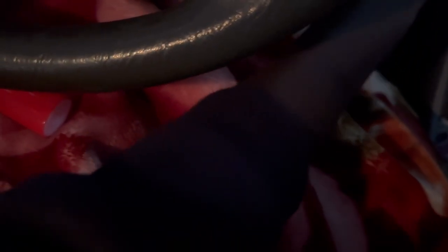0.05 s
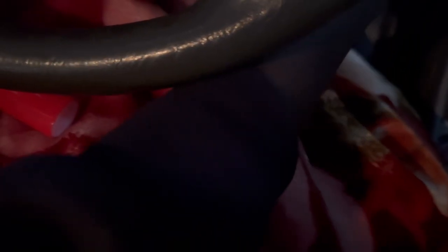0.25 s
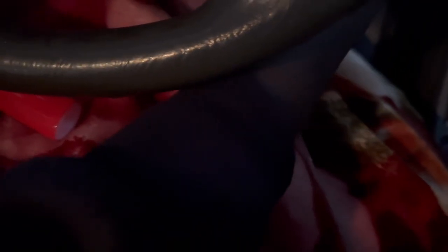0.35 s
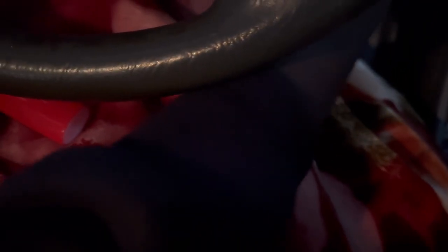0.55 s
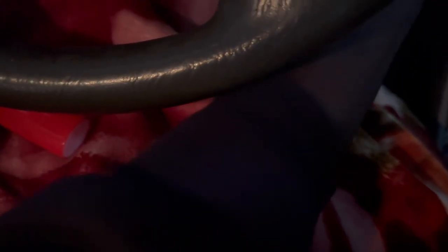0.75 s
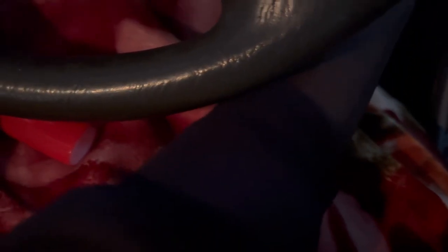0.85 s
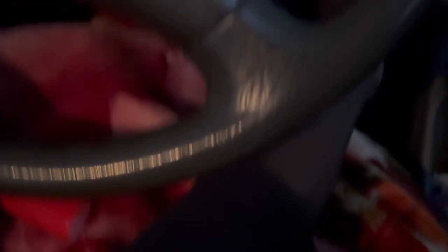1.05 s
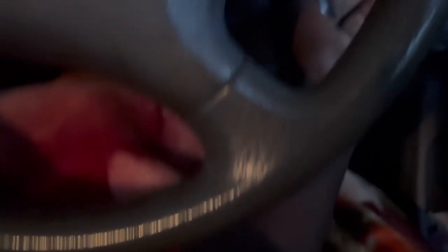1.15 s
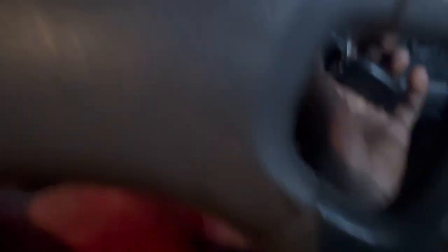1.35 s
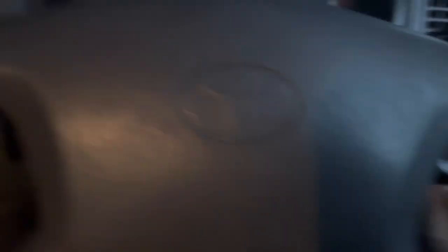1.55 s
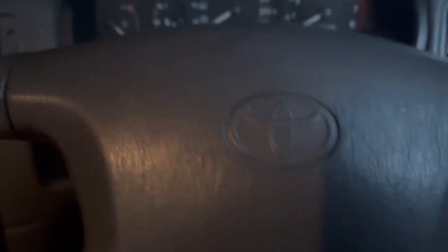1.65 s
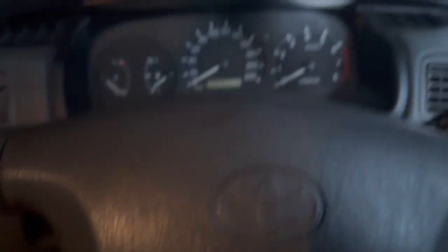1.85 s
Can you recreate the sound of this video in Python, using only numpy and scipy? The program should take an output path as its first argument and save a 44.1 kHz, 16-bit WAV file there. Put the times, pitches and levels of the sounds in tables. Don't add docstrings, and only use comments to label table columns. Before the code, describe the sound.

Key turning in a car ignition with sharp metallic clicks and dull thuds, followed by brief key jingle

```python
import sys
import numpy as np
from scipy import signal
from scipy.fft import rfft, irfft, next_fast_len
from scipy.io import wavfile
from scipy.ndimage import uniform_filter1d, map_coordinates

SR = 44100
rng = np.random.default_rng(int(sys.argv[2]) if len(sys.argv) > 2 else 0)


def field_ratio(decibels):
    return 10 ** (np.asarray(decibels, dtype=float) / 20)


def wrap_up_sound(samples):
    columns = np.atleast_2d(samples).T
    tamed = np.clip(columns, -1, 1)
    steps = np.round(tamed * 32767).astype(np.int16)
    wavfile.write(sys.argv[1], SR, steps)


N = 83790

# (frequency [Hz], level [dB])
RUMBLE_COLOUR = [(12, -51), (20, -21), (43, -3), (97, -3.5), (108, -12), (182, -11), (300, -39.5),
                 (390, -81), (660, -120)]
# (frequency [Hz], level [dB])
HISS_COLOUR = [(180, -53.5), (300, -3.5), (825, -14.5), (4710, -21.5), (6560, -24), (15800, -32.5)]
# (frequency [Hz], likeness [0-1])
HISS_LIKENESS = [(300, 0.089), (9500, 0.09), (10500, 0.31)]
# (frequency [Hz], likeness [0-1])
PORT_LIKENESS = [(200, 0.99), (350, 0.25), (1500, 0.23), (5000, 0.19), (9500, 0.13), (10500, 0.88)]
# (frequency [Hz], difference [dB])
LEFT_LEAN = [(60, 2.5), (130, -5.5), (290, 9.5), (640, 1.5), (1410, -4.5), (3100, -3.5), (6820, 3),
             (15000, -2)]
# (frequency [Hz], width [Hz], amount taken out [dB])
HOUSING_DIP = [(11300, 1400, -6.5)]
# (frequency [Hz], time [s])
CABIN_FADE = [(200, 0.52), (2000, 0.15), (10000, 0.027)]

# (start [s], length [s], level [dB])
RUB_STROKES = [(0.052, 0.1, -62), (0.204, 0.025, -55.5), (0.272, 0.047, -50), (0.352, 0.06, -52),
               (0.449, 0.028, -53.5), (0.481, 0.071, -48.5), (0.685, 0.062, -65), (0.811, 0.052, -69.5),
               (1.008, 0.11, -62.5), (1.194, 0.28, -61.5), (1.331, 0.21, -65.5), (1.618, 0.059, -83.5)]
# (frequency [Hz], level [dB])
RUB_COLOUR = [(200, 3.5), (500, 4.5), (900, -14), (2200, -8), (4300, -11), (9000, -19), (15500, -26),
              (16200, -56)]

# (time [s], peak level [dB], panel note [Hz])
COLUMN_THUDS = [(-0.004, -35, 288), (0.058, -43.5, 429), (0.15, -56.5, 258), (0.236, -28.5, 450),
                (0.309, -28.5, 443), (0.385, -23, 377), (0.415, -22, 280), (0.451, -24, 359.6),
                (0.502, -19, 353), (0.514, -38.5, 249), (0.854, -36.5, 541), (1.088, -34.5, 244),
                (1.219, -43, 330), (1.285, -37, 422), (1.47, -53, 520)]
# (frequency [Hz], width [Hz], level [dB])
COLUMN_NOTES = [(85, 30, -2), (155, 32, 4), (195, 45, -4)]

# (frequency [Hz], level [dB])
CLICK_COLOUR = [(200, 0.5), (800, -8), (1400, -3), (4000, 5), (12400, 0.5), (15600, -8.5), (16500, -35.5),
                (17200, -71.5)]
# (time [s], peak level [dB], part struck [Hz])
TRIM_KNOCKS = [(0.057, -45.5, 533), (0.418, -29, 503), (0.714, -50, 1370), (0.745, -52.5, 466),
               (0.849, -41, 640), (0.973, -53.5, 1403), (1.01, -54.5, 1520), (1.239, -53, 553),
               (1.511, -46.5, 3080), (1.635, -63.5, 900), (1.712, -73.5, 511), (1.783, -66, 1004),
               (1.822, -68, 1353)]
# (frequency [Hz], width [Hz], level over the click [dB])
TRIM_NOTES = [(620, 370, -2), (1170, 270, 6), (1800, 530, 7.5)]

# (time [s], peak level [dB], part struck [Hz])
KEY_RATTLES = [
    (1.2012, -24, 15040),
    (1.2098, -22, 14400),
    (1.217, -27.5, 9000),
    (1.2228, -25, 6100),
    (1.2638, -32, 15440),
    (1.2696, -39, 3100),
    (1.2756, -20.5, 15300),
    (1.2821, -34.5, 14130),
    (1.2855, -34, 3075),
]
# (time [s], peak level [dB], part struck [Hz])
KEY_SLIDES = [
    (1.197, -44.5, 4300),
    (1.205, -37.5, 2720),
    (1.218, -32, 9000),
    (1.235, -48.5, 14100),
    (1.265, -41, 6490),
    (1.279, -29, 6100),
]
# (time [s], peak level [dB], part struck [Hz])
PALM_TOUCHES = [
    (1.0818, -53, 1800),
    (1.0985, -52, 2580),
    (1.1405, -51.5, 6100),
    (1.3582, -34, 7900),
    (1.3843, -36.5, 3230),
    (1.3907, -39, 3400),
    (1.4469, -61, 3200),
    (1.4631, -37, 3160),
    (1.5185, -42.5, 7590),
    (1.8864, -60.5, 3360),
]
# (frequency [Hz], width [Hz], level over the click [dB])
KEY_NOTES = [(1500, 350, 4.5), (2500, 200, 7), (3130, 570, 4), (4300, 280, 6.5), (5160, 560, 4),
             (6100, 200, 12), (7800, 250, 2.5), (9000, 400, 11), (13200, 1800, 6.5), (15430, 400, 14.5)]

# (time [s], peak level [dB], part struck [Hz])
SLOT_TAPS = [(0.0588, -40, 4300), (0.0884, -48, 4300), (0.1, -53, 4200), (0.1057, -45, 4230),
             (0.1236, -45, 2150), (0.1406, -41, 2210), (0.158, -34, 6280), (0.163, -53, 6160),
             (0.6971, -49.5, 2250), (0.735, -54, 2240), (0.8156, -54.5, 2230), (0.848, -45.5, 1364)]
# (time [s], peak level [dB], part struck [Hz])
BLADE_GRINDS = [(0.224, -43.5, 2300), (0.294, -35.5, 1700), (0.303, -34.5, 4300), (0.366, -32.5, 9000),
                (0.386, -36, 2200), (0.402, -30, 9000), (0.414, -32.5, 1102), (0.454, -36, 9000),
                (0.486, -33.5, 9500), (0.498, -26, 1500), (0.509, -30, 4200), (1.039, -35, 5000)]
# (time [s], peak level [dB], part struck [Hz])
TURN_CLICKS = [(0.2096, -58, 7700), (0.2325, -25, 2260), (0.2375, -23.5, 6270), (0.242, -34.5, 6300),
               (0.2628, -31.5, 4300), (0.2877, -35.5, 8360), (0.2968, -37, 7800), (0.3008, -30.5, 4350),
               (0.306, -33, 1740), (0.3108, -28.5, 6740), (0.3361, -41.5, 5140), (0.3694, -36.5, 2430),
               (0.3718, -24.5, 6880), (0.3803, -24.5, 6590), (0.385, -30, 4200), (0.3984, -10.5, 4202),
               (0.407, -29, 2110), (0.4125, -21, 6770), (0.4175, -30, 2260), (0.4437, -40, 2260),
               (0.4511, -17.5, 6726), (0.462, -29.5, 6540), (0.489, -31, 7650), (0.4945, -24.5, 9680),
               (0.5005, -12.5, 2280), (0.507, -13, 6750), (1.0369, -35, 2200), (1.046, -35, 5000),
               (1.051, -37, 1910)]
# (frequency [Hz], width [Hz], level over the click [dB])
BARREL_NOTES = [(1430, 820, 3.5), (1740, 200, 2.5), (2260, 140, 5.5), (3520, 250, 4.5), (4200, 280, 7.5),
                (5160, 110, 4.5), (6300, 450, 2), (6750, 290, 9), (7960, 250, 0), (8940, 350, 11),
                (10080, 1000, 4), (14360, 2000, 8.5)]

RING_DB = -1


def unit(x):
    return x / np.sqrt(np.mean(np.abs(x) ** 2) + 1e-20)


def peak_one(x):
    return x / np.abs(x).max()


def noise():
    return rng.standard_normal((2, N))


def along(points, hz):
    f, value = np.transpose(points)
    return np.interp(np.log(hz + 1), np.log(f + 1), value)


def wobble(rate):
    knots = rng.standard_normal(int(N * rate / SR) + 4)
    return map_coordinates(knots, [np.arange(N) * rate / SR])


def filtered(x, response):
    size = next_fast_len(x.shape[-1] + 8192)
    spectrum = rfft(x, size) * response(np.fft.rfftfreq(size, 1 / SR))
    return irfft(spectrum, size)[..., :x.shape[-1]]


def modes(table, f, scatter_db=0):
    total = 0
    for k, (center, width, db) in enumerate(table):
        level = field_ratio(db + scatter_db * rng.standard_normal())
        resonance = 1j * f * width / (center * center - f * f + 1j * f * width)
        total = total + (-1) ** k * level * resonance
    return total


def ports(pair, likeness=PORT_LIKENESS):
    lag_s = 6 / 44100

    def share(hz):
        angle = np.arccos(np.clip(along(likeness, hz), -1, 1)) / 2
        return np.array([np.cos(angle), np.sin(angle)])

    def lean(hz):
        left = field_ratio(along(LEFT_LEAN, hz) / 2) * np.exp(-1j * np.pi * hz * lag_s)
        return np.array([left, 1 / left])

    mid, side = filtered(pair, share)
    return filtered(np.array([mid + side, mid - side]), lean)


def background():
    def colour(points):
        closed = [(13, -63.5)] + list(points) + [(points[-1][0] * 0.94, -120)]
        return lambda f: field_ratio(along(closed, f))

    rumble = unit(filtered(rng.standard_normal((3, N)), colour(RUMBLE_COLOUR)))
    rumble = rumble[:2] + 2.45 * rumble[2]
    rumble = rumble * field_ratio(-61 + 1.5 * wobble(29))
    hiss = unit(ports(filtered(noise(), colour(HISS_COLOUR)), HISS_LIKENESS))
    return rumble + field_ratio(-76.5) * hiss


def cabin(x):
    hz, t, z = signal.stft(rng.standard_normal((2, SR // 4)), SR, nperseg=256)
    fade = field_ratio(-60 * t / along(CABIN_FADE, hz)[:, None])
    tail = signal.istft(z * fade, SR, nperseg=256)[1]
    return signal.fftconvolve(x, tail / np.linalg.norm(tail[0]), axes=1)[:, :N]


def sleeve():
    center_s, half_s, center_hz, width_hz = 1.67, 0.026, 9270, 720
    thin = unit(filtered(noise(), lambda f: np.exp(-((f - center_hz) / width_hz) ** 2 / 2)))
    swell = np.exp(-((np.arange(N) / SR - center_s) / half_s) ** 2)
    return field_ratio(-73) * swell * thin * field_ratio([[-7], [7]])


def rubbing():
    rise_s, fall_db_per_s = 0.0066, 501
    t = np.arange(N) / SR
    strokes = []
    for start, length, db in RUB_STROKES:
        before = np.maximum(start - t, 0) / rise_s * 20
        after = np.maximum(t - start - length, 0) * fall_db_per_s
        strokes.append(db - before - after)
    effort_db = np.max(strokes, axis=0)
    grain = field_ratio(3 * (wobble(56.23) + wobble(400))) * noise()
    slide = unit(filtered(grain, lambda f: field_ratio(along(RUB_COLOUR, f)) * np.abs(1 + 1.1 * modes(BARREL_NOTES, f))))
    grip = unit(filtered(noise(), lambda f: modes(COLUMN_NOTES, f) / (1 + 1j * f / 250) ** 2))
    heft = uniform_filter1d(field_ratio(-56 + 0.91 * (effort_db + 62.5)), size=3000)
    return field_ratio(effort_db) * slide + heft * grip


def column():
    lead_s = 0.05
    panel_q = 2.87
    push, tap = np.zeros((2, N + SR)), np.zeros((2, N + SR))
    t = np.arange(4096) / SR
    for s, db, hz in COLUMN_THUDS:
        start = round((s + lead_s) * SR)
        push[:, start] += field_ratio(db + 38.5)
        shake = field_ratio(-60 * t / 0.08) * rng.standard_normal((2, len(t)))
        ring = filtered(shake, lambda f: modes([(hz, hz / panel_q, 0)], f) ** 2)
        tap[:, start:start + len(t)] += field_ratio(0.49 * db - 28.5) * peak_one(ring)
    thud = filtered(push, lambda f: modes(COLUMN_NOTES, f) / (1 + 1j * f / 300) ** 2)
    return (thud + tap)[:, round(lead_s * SR):][:, :N]


def contacts(rows, body, t60, tilt_db, ring_db, rise_s, clean_db):
    out, t = np.zeros((2, N + SR)), np.arange(4096) / SR
    rise = 1 - np.exp(-t / rise_s)
    chatter_shape = field_ratio(-60 * t / t60) * rise ** 2
    clean_shape = field_ratio(-60 * t / 0.035) * rise ** 2
    blow = 1.0 * (t == 0)
    for s, db, hz in rows:
        def ring(f):
            struck = modes([(hz, max(hz / 31, 190), 7)], f)
            return field_ratio(ring_db) * modes(body, f, scatter_db=3) + struck

        def tone(f):
            tilt = tilt_db + 0.5 * np.log2(hz / 5000)
            broad = field_ratio(along(CLICK_COLOUR, f) + tilt * np.log2((f + 300) / 4000))
            lift = field_ratio(8 * np.exp(-(np.log2((f + 1) / hz) / 0.12) ** 2))
            return broad * lift * (1 - modes(HOUSING_DIP, f))

        grit = field_ratio(3 * unit(uniform_filter1d(rng.standard_normal(len(t)), size=30)))
        rough = rng.standard_normal((2, len(t))) * grit * chatter_shape
        chatter = filtered(rough, lambda f: tone(f) * (1 + ring(f)))
        clean = clean_shape * filtered(blow, lambda f: tone(f) * ring(f) * np.array([[1], [1j]]))
        hit = peak_one(peak_one(chatter) + field_ratio(clean_db) * peak_one(clean))
        start = round(s * SR)
        out[:, start:start + len(t)] += field_ratio(db) * hit
    return out[:, :N]


def trim():
    return contacts(TRIM_KNOCKS, TRIM_NOTES, t60=0.039, tilt_db=-5.5, ring_db=1, rise_s=0.0016, clean_db=-26)


def keys():
    bunch = contacts(KEY_RATTLES, KEY_NOTES, t60=0.0154, tilt_db=0.46, ring_db=RING_DB,
                     rise_s=0.0013, clean_db=-9.5)
    slide = contacts(KEY_SLIDES, KEY_NOTES, t60=0.034, tilt_db=0.0, ring_db=-8.5,
                     rise_s=0.0017, clean_db=-30)
    palm = contacts(PALM_TOUCHES, KEY_NOTES, t60=0.025, tilt_db=-1.3, ring_db=RING_DB,
                    rise_s=0.0018, clean_db=-11.5)
    return bunch + slide + palm


def spring_back():
    first_s, flight_s = 0.5252, 0.0187
    bounces = np.zeros((2, N))
    for k in range(5):
        hit = [(first_s + k * flight_s, -28 - k * 8, 4200)]
        bounces += contacts(hit, BARREL_NOTES, t60=0.02, tilt_db=-0.9 - k * 1.5, ring_db=RING_DB,
                            rise_s=0.0009, clean_db=1.5)
    return bounces


def lock():
    taps = contacts(SLOT_TAPS, BARREL_NOTES, t60=0.027, tilt_db=-5, ring_db=2, rise_s=0.002, clean_db=-6)
    turns = contacts(TURN_CLICKS, BARREL_NOTES, t60=0.014, tilt_db=0.9, ring_db=RING_DB,
                     rise_s=0.0008, clean_db=-2.0)
    grind = contacts(BLADE_GRINDS, BARREL_NOTES, t60=0.04, tilt_db=-1.2, ring_db=-5.5,
                     rise_s=0.003, clean_db=-28.5)
    return taps + turns + grind + spring_back()


def scene():
    near = field_ratio(2.5) * (lock() + keys() + trim()) + column()
    echo = field_ratio(-16) * cabin(near)
    return ports(near + echo + rubbing()) + sleeve() + background()


def low_pass(x):
    return signal.sosfilt(signal.butter(12, 16980, fs=SR, output="sos"), x)


def record(dry):
    return low_pass(dry)


dry = scene()
out = record(dry)
wrap_up_sound(out)
```